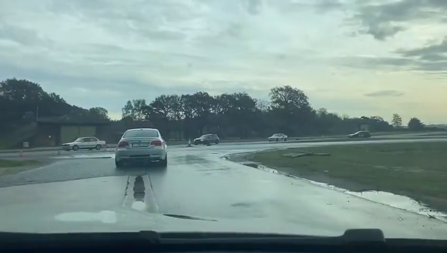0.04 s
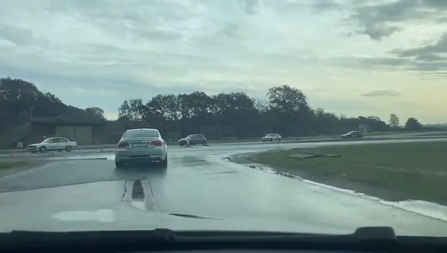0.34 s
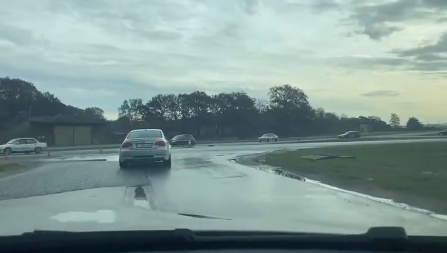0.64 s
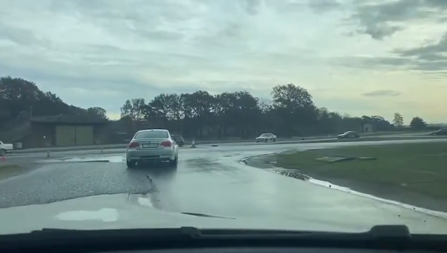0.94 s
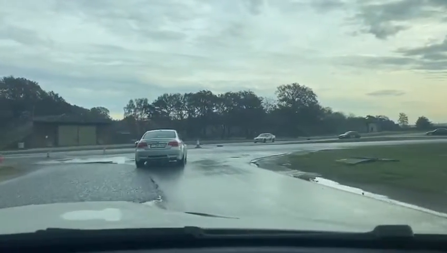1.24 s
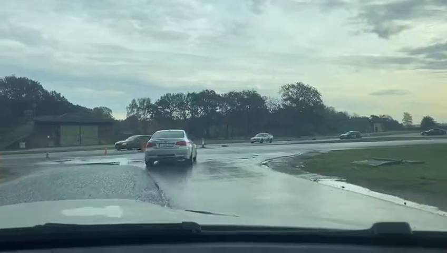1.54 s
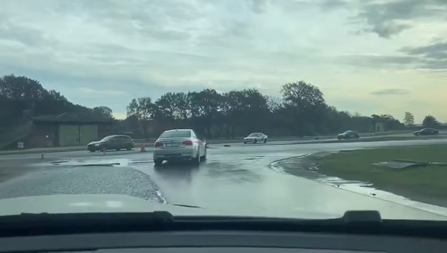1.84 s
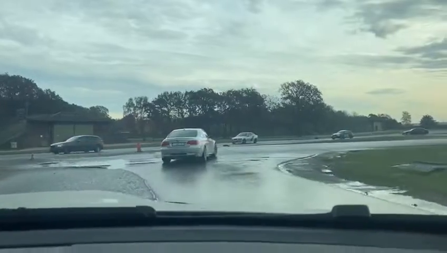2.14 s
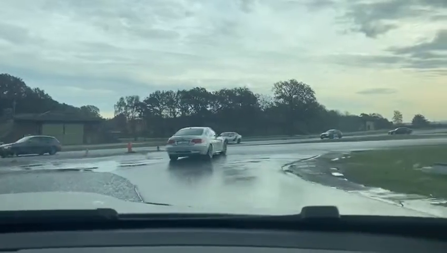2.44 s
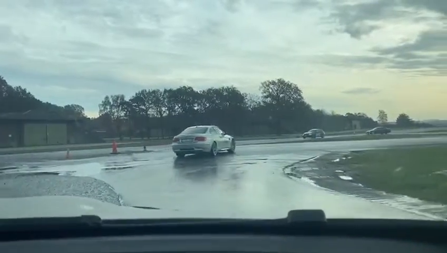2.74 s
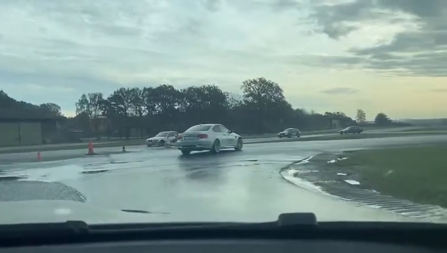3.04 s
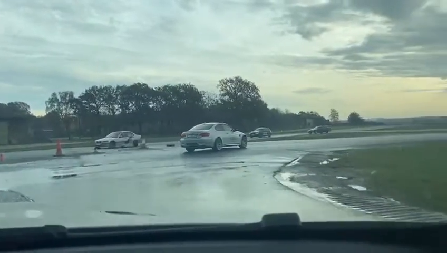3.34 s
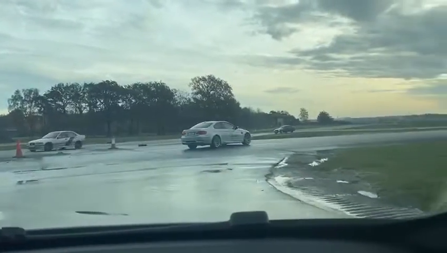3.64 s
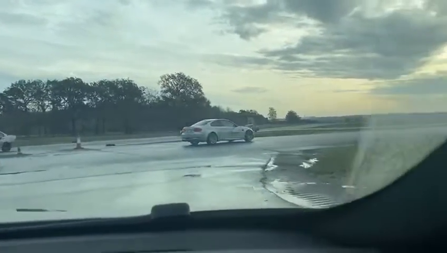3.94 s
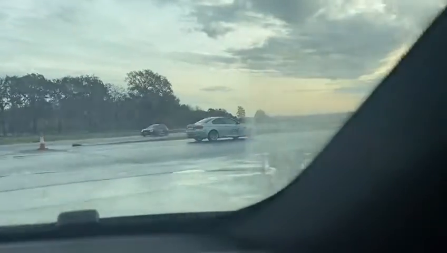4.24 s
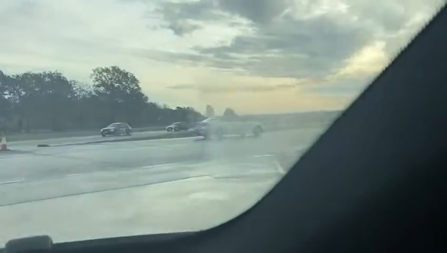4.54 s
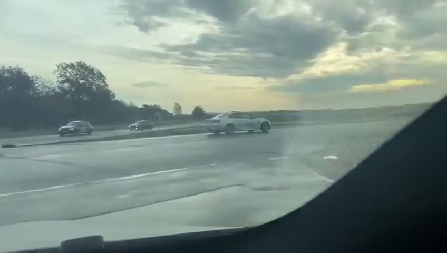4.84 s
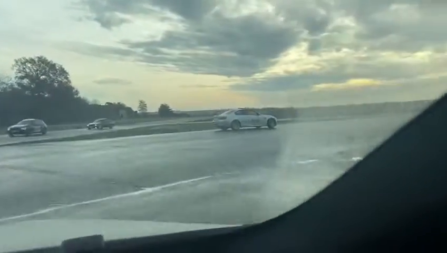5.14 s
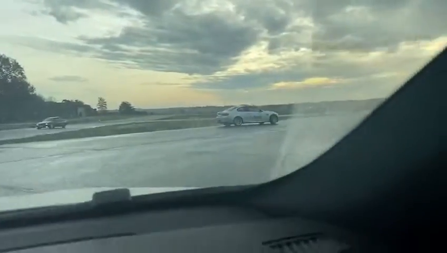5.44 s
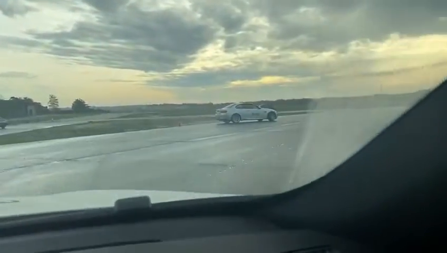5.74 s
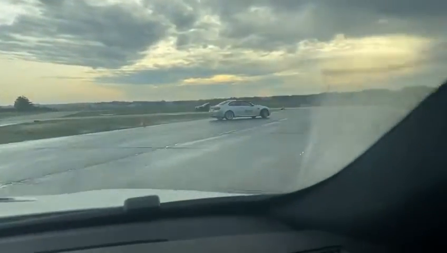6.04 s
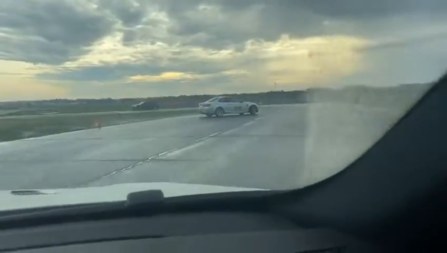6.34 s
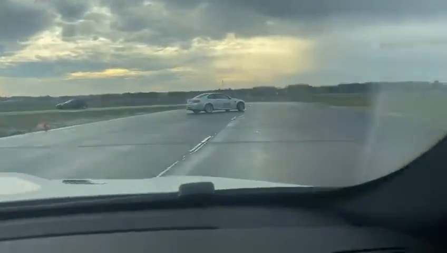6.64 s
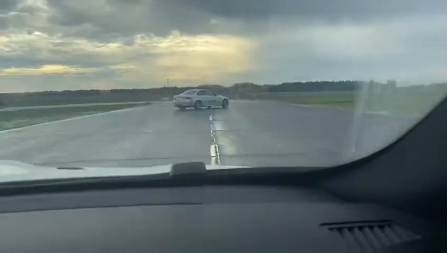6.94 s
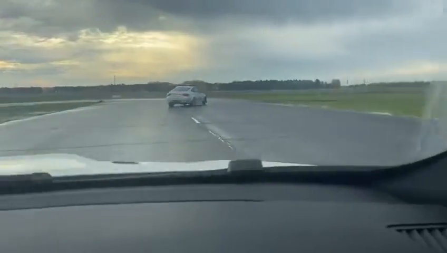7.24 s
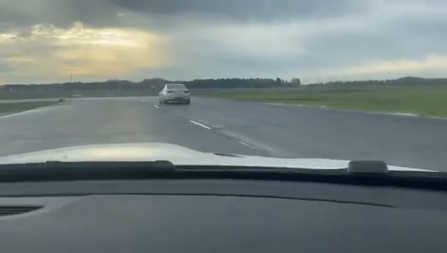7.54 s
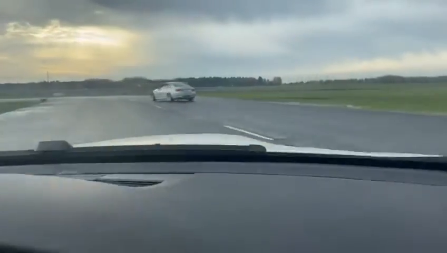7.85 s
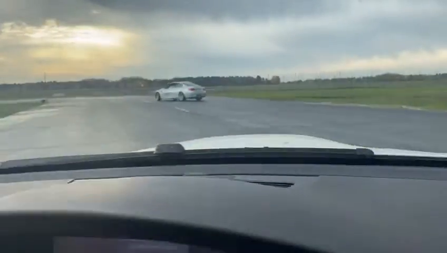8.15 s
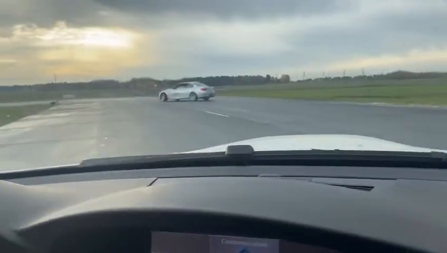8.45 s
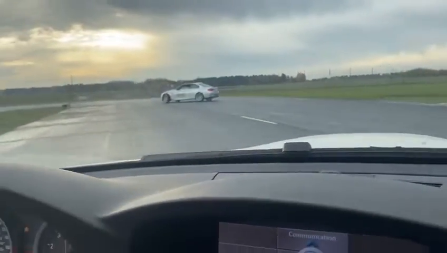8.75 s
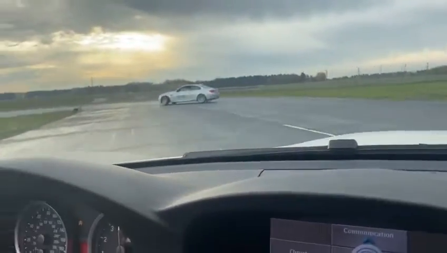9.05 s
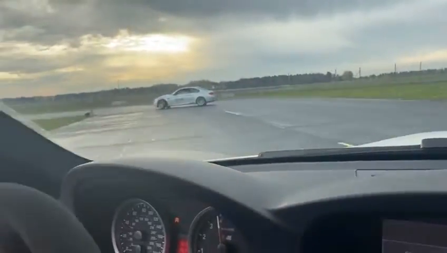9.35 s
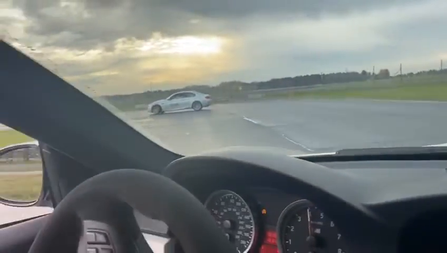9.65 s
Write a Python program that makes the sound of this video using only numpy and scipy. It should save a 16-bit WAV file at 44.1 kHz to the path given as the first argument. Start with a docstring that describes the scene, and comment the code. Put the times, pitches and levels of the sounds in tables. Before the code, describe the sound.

A low engine drone booms inside a car drifting on a wet track, revving up three times over tyre roar and water spray.

```python
"""A low engine drone over road rumble, from a stereo microphone inside a six-cylinder car drifting round a
wet track. Its firing pulses boom in the body and climb in three pulls of throttle. The exhaust of the car
it chases sings through the glass, and a third car hums further off. Close by, the tyres roar and scrub,
water washes and sprays in the wheel arches, loose trim knocks and the final drive whines faintly."""
import sys
import numpy as np
from scipy import signal
from scipy.fft import rfft, irfft, next_fast_len
from scipy.io import wavfile
from scipy.ndimage import uniform_filter1d

SR = 44100
rng = np.random.default_rng(int(sys.argv[2]) if len(sys.argv) > 2 else 0)


def master(y):
    """Save y as 16-bit WAV."""
    cut = np.clip(np.atleast_2d(y).T, -1, 1)
    pcm = np.round(cut * 32767)  # scale
    wavfile.write(sys.argv[1], SR, pcm.astype(np.int16))


N = 427769
T = np.arange(N) / SR
SIZE = next_fast_len(N + SR // 4)
BINS = np.arange(SIZE // 2 + 1) * SR / SIZE

# strength of each of the six cylinders on throttle: gain_db
LOADED_CYLINDERS = [-4.5, -8.5, 0, -9.5, 6.5, -1.5]
# the car's own exhaust, heard from the cabin: frequency_hz, gain_db
RASP_COLOUR = [(90, -52), (170, -9), (260, 13.5), (380, -4), (520, 0), (750, -16.5), (1050, -17),
               (1600, -21), (3500, -48.5)]
# spray in the wheel arches, heard from the cabin: frequency_hz, gain_db
SPRAY_COLOUR = [(600, -16), (1500, 2.5), (2400, 6), (3500, 2), (5500, 2.5), (7200, 0.5), (8400, -21.5),
                (9400, 2), (10900, -2), (12000, -34.5)]


def engine():
    """The six-cylinder around the microphone: a low drone, and three pulls that climb in pitch."""
    # two stabs of throttle, each: time_s, firing_hz, firing_db, rasp_db
    first_stab = [(2.7, 119.7, -21.5, -45.5), (2.9, 142.2, -19.5, -41.5), (3.05, 167.7, -14, -38.5),
                  (3.18, 195.6, -27, -40.5), (3.3, 235.7, -29, -31), (3.4, 262, -28, -30.5),
                  (3.52, 291.3, -39, -37.5), (3.62, 285, -58, -44)]
    last_stab = [(6.72, 196.3, -23, -38), (6.82, 197.6, -18, -29), (6.9, 218.5, -19, -30),
                 (7.04, 258.3, -13, -25.5), (7.1, 285.4, -27.5, -36), (7.2, 302, -34, -32),
                 (7.28, 298, -40, -49)]
    return (rolling_drone() + sliding_boom()
            + throttle_stab(first_stab, rasp_gain_db=2, scatter_db=2.5, snarl_db=-6.5, octave_db=-5)
            + long_pull()
            + throttle_stab(last_stab, rasp_gain_db=-.5, scatter_db=9, snarl_db=-11.5, octave_db=-3.5))


def rolling_drone():
    """Part throttle: three firings a crank turn make a low tone, with weaker half orders beside it."""
    # the engine rolling up: time_s, crank_hz, firing_db
    roll = [(0.0, 44.57, -5), (0.19, 45, -40), (0.6, 52.53, -33.5), (1.2, 44.1, -25.5), (1.45, 44, -38.5),
            (1.53, 45.97, -19.5), (1.72, 44.04, -18), (2.4, 49, -24), (2.85, 48.32, -29)]
    crank_hz, firing_db = curves(roll)
    firings = 3 * turns(crank_hz, .0054)
    drone = tone(firings, firing_db, .97)
    drone += tone(firings / 2, firing_db - 8, .7) + tone(1.5 * firings, firing_db - 19.5, 3)
    return drone * sounding(roll)


def sliding_boom():
    """Holding the slide: under load the crank orders boom in the body, over firing tone and rasp."""
    # the engine in the slide: time_s, crank_hz, firing_db, rasp_db
    slide = [(6.45, 51.9, -50, -41.5), (6.7, 49.18, -20, -29.5), (7.0, 50.27, -41, -33),
             (7.6, 48.25, -43, -42.5), (8.3, 47.71, -34, -24), (8.75, 46.27, -30, -33),
             (9.0, 44.34, -25, -34.5), (9.3, 44.22, -20.5, -31), (9.7, 46, -17.5, -33)]
    # spells under load: start_s, end_s, first_order_db, second_order_db
    booms = [(6.522, 6.887, -10.5, -17), (6.933, 6.994, -14.5, -30.5), (7.189, 7.225, -17.5, -9.5),
             (7.573, 7.742, -24.5, -14.5), (7.78, 9.206, -15.5, -20.5)]
    # overtones against the boom's first order: crank_order, gain_db
    overtones = [(4, -20), (5, -13.5), (7, -21.5), (8, -23.5)]
    # strength of each cylinder in the slide: gain_db
    cylinders = [0, -3.5, -5.5, -6, -15, -2]
    crank_hz, firing_db, rasp_db = curves(slide)
    crank = turns(crank_hz, .005016)
    first = swells(booms, column=2, attack_s=.023, release_s=.038, floor_db=-28)
    second = swells(booms, column=3, attack_s=.023, release_s=.038, floor_db=-29)
    boom = first * tone(crank, 0, .7) + second * tone(2 * crank, 0, 4.2)
    boom += first * sum(tone(order * crank, db, 3.4) for order, db in overtones)
    firing = tone(3 * crank, firing_db, .96) + tone(9 * crank, firing_db - 19.5, 4.3)
    rasp = undb(rasp_db) * exhaust(3 * crank, cylinders, scatter_db=6, gas=.072)
    return (boom + firing + rasp) * sounding(slide)


def throttle_stab(table, rasp_gain_db, scatter_db, snarl_db, octave_db):
    """The wheels spin up: the firing tone climbs, the exhaust rasps and the intake snarls in gulps."""
    firing_hz, firing_db, rasp_db = curves(table)
    # the intake, heard from the cabin: frequency_hz, gain_db
    snarl_colour = [(300, -12), (520, 2.5), (740, -2.5), (860, -11.5), (1000, -9), (1400, -22.5)]
    firings = turns(firing_hz, .012)
    rasp = undb(rasp_db + rasp_gain_db) * exhaust(firings, LOADED_CYLINDERS, scatter_db, gas=.92)
    octave = tone(2 * (firings + .035 * walk(120)), rasp_db + octave_db, 2.5)
    throat = tone(1.5 * firings, rasp_db - 8, 2.5)  # the two halves of the manifold differ
    gulps = undb(5 * np.cos(2 * np.pi * firings) + 3 * walk(45))
    snarl = undb(rasp_db + snarl_db) * noise(snarl_colour, (300, 1500), gulps)
    snarl += tone(4 * (firings + .05 * walk(120)), rasp_db + snarl_db - 13, 3)
    return (tone(firings, firing_db, 1.1) + octave + throat + rasp + snarl) * sounding(table)


def long_pull():
    """Under load from low revs: a clean, rising firing tone and throaty side orders over a light rasp."""
    # the engine through the bend: time_s, firing_hz, firing_db, rasp_db
    bend = [(3.78, 78, -19, -70), (4.25, 87.7, -18.5, -34), (4.45, 102.4, -14, -38.5),
            (5.08, 126.4, -12, -35), (5.42, 151.1, -7.5, -22.5), (5.8, 190.9, -11, -46.5),
            (5.97, 216.6, -12.5, -28), (6.08, 230.3, -16.5, -33.5), (6.35, 218.9, -15.5, -45),
            (6.6, 220.4, -23, -44)]
    firing_hz, firing_db, rasp_db = curves(bend)
    firings = turns(firing_hz, .004)
    cutoff_hz, slope_hz = 260.3, 20.8  # the cabin muffles the octave once it climbs past the cut-off
    muffled = (1 + np.tanh((2 * firing_hz - cutoff_hz) / slope_hz)) / 2
    octave_db = firing_db - 9.5 * (1 - muffled) - 27 * muffled
    rasp = undb(rasp_db - 2.5) * exhaust(firings, LOADED_CYLINDERS, scatter_db=2.5, gas=.15)
    firing = tone(firings, firing_db, .9) + tone(2 * firings, octave_db, 1.5)
    throat = tone(1.5 * firings, rasp_db - 5.5, 2.8) + tone(2.5 * firings, rasp_db - 8.5, 1.8)
    throat += tone(3 * firings, rasp_db - 14, 2.7)
    return (firing + throat + rasp) * sounding(bend)


def exhaust(firings, cylinders, scatter_db, gas):
    """A pulse per firing, uneven over the cylinders, each with a puff of gas; steady rms 1."""
    count = np.arange(1, int(firings[-1]))
    at = np.interp(count, firings, np.arange(N))
    cylinder_db = np.array(cylinders)[count % len(cylinders)]
    size = undb(cylinder_db + scatter_db * rng.standard_normal(len(count)))
    sample, late = at.astype(int), at % 1  # each pulse is shared between two samples
    pulses = np.bincount(sample, size * (1 - late), N + 1) + np.bincount(sample + 1, size * late, N + 1)
    puffs = np.exp(-2 * (firings % 1)) * rng.standard_normal(N)
    rasp = shape(unit(pulses[:N]) + gas * unit(puffs), response(RASP_COLOUR))
    return rasp / np.sqrt(uniform_filter1d(rasp ** 2, SR // 10) + 1e-12)


def car_ahead():
    """Mostly its firing octave gets through the glass; on throttle its orders bark in cabin resonances."""
    # the engine of the car being chased: time_s, firing_hz, octave_db
    revs = [(0.0, 183.3, -45.5), (1.5, 184.4, -40.5), (1.75, 168.5, -41.5), (1.92, 184.4, -28.5),
            (2.15, 215, -41), (2.6, 192.2, -34.5), (2.85, 188, -28), (3.1, 192.6, -35), (3.4, 184.4, -26.5),
            (3.7, 204.3, -34.5), (3.98, 188.2, -26.5), (4.25, 181.1, -25.5), (4.7, 173.6, -35),
            (5.1, 178, -31), (5.3, 196.8, -26.5), (5.5, 177.1, -26), (5.6, 181.3, -17.5),
            (5.79, 194.3, -22), (6.02, 204.1, -32), (6.28, 217, -28), (6.55, 221, -47)]
    # its bursts of throttle: start_s, end_s, bark_db, growl_db
    barks = [(1.955, 2.034, -38, -56.5), (3.4, 3.68, -45.5, -55.5), (3.926, 4.102, -42.5, -56),
             (5.252, 5.34, -31, -41), (5.547, 5.727, -23, -44), (5.75, 6.065, -25, -34),
             (6.096, 6.269, -40, -42)]
    # its exhaust orders, 2.5 to 8.5 times the firing rate in half steps: gain_db
    orders = [-2.5, 2, -19.5, 1, 0, 2.5, -0.5, -0.5, -10.5, 2, -3.5, 8.5, 2]
    # the resonances those orders sweep through: frequency_hz, gain_db
    bark_colour = [(300, -15.5), (450, -15), (540, -3.5), (610, 3.5), (680, -4), (750, 1.5), (810, -1),
                   (900, -9), (1000, -9), (1150, -17.5), (1360, -16), (1600, -42.5), (3000, -42)]
    # its gas noise: frequency_hz, gain_db
    growl_colour = [(300, -6), (480, 3), (720, -6), (960, 4.5), (1120, -7), (1500, -20)]
    firing_hz, octave_db = curves(revs)
    firings = turns(firing_hz, .0035)
    throttle = swells(barks, column=2, attack_s=.1, release_s=.14, floor_db=-62, edge_db=-1)
    growl = swells(barks, column=3, attack_s=.1, release_s=.14)
    flat_out = throttle / throttle.max()  # the uneven banks' half orders come in with the throttle
    shake = .012 + .009 * growl / growl.max()
    pipes = sum(tone(k / 2 * (firings + shake * walk(110)), db, 2.5) * flat_out ** (k % 2)
                for k, db in enumerate(orders, 5))
    throb = undb(5 * np.cos(np.pi * firings) + 2 * walk(60))  # at half the firing rate
    gas = noise(growl_colour, (300, 1500), throb)
    song = tone(2 * firings, octave_db, 2.6) + tone(firings, octave_db - 4, 1.2)
    return song + throttle * shape(pipes, response(bark_colour)) + growl * gas


def wet_road():
    """The body rumbles, the tread roars, and water washes the floor and spatters the arches in clumps."""
    # relative road noise, louder with speed and wheelspin: time_s, rumble_db, roar_db, wash_db
    road = [(0.0, -21, -46, -56.5), (1.3, -25.5, -43, -66), (2.1, -25, -43, -56.5), (2.9, -21, -44, -55),
            (3.5, -19.5, -42, -46.5), (3.9, -20, -38.5, -53.5), (4.5, -18, -32, -47.5),
            (5.05, -20, -34, -43.5), (5.6, -19, -32.5, -42), (6.2, -17.5, -28.5, -39),
            (6.45, -19.5, -46, -42), (7.0, -19.5, -23.5, -49), (7.45, -18, -46, -41),
            (7.64, -16.5, -34.5, -40.5), (7.9, -19, -27, -34), (8.37, -19.5, -26.5, -34),
            (9.05, -20.5, -38, -38.5), (9.7, -22.5, -33, -38.5)]
    # puddles hitting the car, in relative levels: start_s, end_s, spray_db, wash_db
    puddles = [(1.58, 1.767, -62, -58.5), (2.547, 2.877, -62.5, -66), (3.95, 4.353, -56, -56.5),
               (4.514, 4.96, -51.5, -57), (5.28, 6.34, -50.5, -53), (6.591, 6.818, -47, -34.5),
               (7.494, 7.695, -56.5, -58), (7.798, 7.975, -47.5, -35), (7.995, 8.484, -53, -55)]
    # body rumble, tyre roar and water wash in the cabin, each: frequency_hz, gain_db
    rumble_colour = [(15, -24.5), (28, -12), (40, 2.5), (65, 0.5), (100, 1.5), (140, -3.5), (200, -9),
                     (300, -31.5)]
    roar_colour = [(80, -20.5), (150, 3.5), (230, 9.5), (310, -0.5), (520, -10.5), (800, -20.5),
                   (1300, -32), (2500, -40)]
    wash_colour = [(250, -7.5), (500, 11.5), (1100, 11), (1500, 3), (2000, 2), (3000, -8.5), (5000, -19),
                   (11000, -58)]
    rumble_db, roar_db, wash_db = curves(road)
    # a puddle is shallower at its edges
    splash = swells(puddles, column=2, attack_s=.035, release_s=.018, edge_db=-6)
    surge = swells(puddles, column=3, attack_s=.035, release_s=.018, edge_db=-6)
    depth = (splash / splash.max()) ** 2
    clumps = undb(1.9 * depth * walk(190))
    mist = np.hypot(undb(-63), undb(wash_db - 21.5))  # the spray left between puddles
    drops = undb(2.4 * walk(2500) + .6 * walk(45))
    rumble = noise(rumble_colour, (55, 85))
    roar = noise(roar_colour, (280, 340))
    wash = noise(wash_colour, (1400, 2600)) * np.hypot(undb(wash_db), surge)
    spray = noise(SPRAY_COLOUR, (4500, 7500), drops) * np.hypot(mist, splash)
    tyres = rumble * undb(rumble_db - 3.5) + roar * undb(roar_db - 4 + 1.3 * walk(14))
    water = wash * undb(-6 + 1.37 * walk(20)) + spray + spatter() * splash * depth * undb(-9)
    return tyres + clumps * water


def spatter(drops_per_s=380, spread_db=3):
    """Single drops tick against the arches: many small ones and a few big ones."""
    hits = rng.random(N) < drops_per_s / SR
    sizes = undb(spread_db * np.minimum(rng.exponential(size=N), 4))
    return noise(SPRAY_COLOUR, (4500, 7500), hits * sizes)


def third_car():
    """A car further round the track: only the firing tone and a little of its octave carry this far."""
    # the distant engine: time_s, firing_hz, level_db
    revs = [(1.6, 198, -36.5), (2.15, 212, -33), (2.4, 224, -36.5), (2.65, 243, -29.5), (2.85, 258, -37),
            (3.0, 250, -52), (3.25, 172, -35.5), (3.4, 172.1, -23), (3.6, 182, -27), (4.05, 198, -24),
            (4.3, 207, -24.5), (4.5, 220, -24.5)]
    firing_hz, level_db = curves(revs)
    firings = turns(firing_hz, .005)
    hum = tone(firings, level_db, 1.8) + tone(2 * firings, level_db - 18, 3.4)
    return hum * sounding(revs, fade_s=.091)


def trim_knocks():
    """A loose part or a slap of water ticks against a padded panel and sets it ringing."""
    # the knocks, in relative levels: start_s, thud_db, tick_db, tick_hz, tick_decay_s
    knocks = [(0.413, -25, -46.5, 910, 0.0035), (0.69, -26.5, -60, 800, 0.0056),
              (0.883, -51, -47, 2190, .008), (1.385, -35.5, -43, 1500, 0.00074),
              (4.088, -24.5, -44, 1500, .006), (4.271, -22, -55.5, 2003, 0.0022),
              (5.569, -25, -44.5, 3033, .003), (6.577, -26, -33, 2000, .004), (7.155, -22, -32, 563, .012)]
    # trim panel modes, detuned afresh at every knock: nominal_hz, gain_db, t60_s
    panel = [(261, 12, 0.096), (365, 8, 0.073), (473, -6.5, 0.051), (744, -2, 0.077), (1600, -14, 0.052)]
    out, t = np.zeros(N + SR), T[:SR // 5]
    onset = 1 - np.exp(-t / .001)
    for start_s, thud_db, tick_db, tick_hz, decay_s in knocks:
        ring = onset * sum(undb(db - 60 * t / t60) * np.sin(2 * np.pi * hz * rng.uniform(.79, 1.05) * t)
                           for hz, db, t60 in panel)
        width_hz = min(5 / decay_s, SR / 4)  # the shorter a tick, the wider its band
        band = signal.iirpeak(tick_hz, tick_hz / width_hz, fs=SR)
        burst = np.exp(-t / decay_s) * rng.standard_normal(len(t))
        tick = unit(signal.lfilter(*band, signal.lfilter(*band, burst)))
        out[int(start_s * SR):][:len(t)] += undb(thud_db - 6.5) * ring + undb(tick_db - 15.5) * tick
    return out[:N]


def tyre_scrub(drift=.016, jitter=.05):
    """Tread blocks stick and slip on the wet surface: broken, wavering chirps, short of a squeal."""
    # tyres sliding sideways: start_s, end_s, pitch_hz, level_db
    skids = [(2.48, 3.0, 1260, -50), (6.01, 6.059, 1150, -40.5), (6.24, 6.378, 1300, -42),
             (7.597, 8.299, 1090, -43.5), (8.297, 9.703, 1120, -41)]
    # tread resonances: pitch_ratio, gain_db
    tread = [(1, -1), (.735, -5), (1.17, -2), (1.5, -5.5)]
    pitch_hz, = curves([(s, hz) for start, end, hz, _ in skids for s in (start, end)])
    pitch_hz *= 1 + drift * walk(8)
    level = swells(skids, column=3, attack_s=.08, release_s=.095)
    modes = [tone(turns(ratio * pitch_hz * (1 + jitter * walk(300)), drift), db, 2.8)
             for ratio, db in tread]
    # a light slide chatters as the tread catches; a hard one runs on and the other resonances join in
    hard = level / level.max()
    catches = undb(4 * (1 - hard) * (np.tanh(walk(150)) - .5))
    return level * catches * (modes[0] + hard * sum(modes[1:]))


def final_drive():
    """Gear teeth whine faintly while the rear wheels spin."""
    # the meshing gears: time_s, mesh_hz, relative_db
    whine = [(8.3, 530.4, -40.5), (9.136, 517.7, -35), (9.55, 554.4, -41.5), (9.7, 552, -38)]
    mesh_hz, relative_db = curves(whine)
    return tone(turns(mesh_hz, .0033), relative_db - .5, .78) * sounding(whine, fade_s=.16)


def trim_squeak(start_s=4.376, length_s=.04, pitch_hz=4300):
    """Two pieces of trim rub in two short jerks as the body twists."""
    jerks = np.sin(2 * np.pi * np.clip((T - start_s) / length_s, 0, 1))
    rough_hz = pitch_hz * (1 + .08 * walk(1500))
    return tone(turns(rough_hz, .01), -52, 3) * jerks


def cabin(mid, around, width_colour, width_db, direct):
    """Direct sound reaches the left capsule first; sound from all around scatters off the glass."""
    t, lag_s = T[:SR // 16], .00042
    scatter = rfft(rng.standard_normal(len(t)) * np.exp(-t / .011), SIZE)
    lead = 1j * direct * np.tanh(4 * np.sin(2 * np.pi * np.minimum(BINS * lag_s, 1)))
    diffuse = np.sqrt(1 - abs(lead) ** 2) * scatter / abs(scatter)
    width = response(width_colour) * undb(width_db)
    side = shape(mid, width * lead) + shape(around, width * diffuse)
    return np.array([mid + side, mid - side])


def through_glass(car, swing_s=(2.5, 4.1)):
    """The cabin's standing waves change as the chased car swings from dead ahead to the side."""
    # side against mid at the microphone, with that car in front and then aside: frequency_hz, gain_db
    front_width = [(150, -11), (380, -3), (580, 7.5), (780, 1), (970, 9.5), (2000, 1.5)]
    aside_width = [(150, -10), (280, -1), (360, 10), (395, 2), (520, 8), (600, 2.5), (660, 3.5),
                   (730, 23.5), (800, 10), (880, 4.5), (980, -2), (1400, 4.5)]

    def place(width, direct):
        mid = shape(car, 1 / np.hypot(1, response(width)))  # so that width adds no power
        return cabin(mid, mid, width, width_db=0, direct=direct)

    swing = np.interp(T, swing_s, [0, 1])
    return (1 - swing) * place(front_width, direct=.99) + swing * place(aside_width, direct=1)


def undb(db):
    """Decibels to gain."""
    return 10 ** (np.asarray(db) / 20)


def unit(x):
    """Scale to rms 1."""
    return x / np.sqrt(np.mean(x ** 2))


def curves(table):
    """The columns after a table's time column, sample by sample."""
    time_s, *columns = np.transpose(table)
    return [np.interp(T, time_s, column) for column in columns]


def sounding(table, fade_s=.018):
    """1 between the times of the first and last row, fading outside."""
    return np.clip(1 + np.minimum(T - table[0][0], table[-1][0] - T) / fade_s, 0, 1)


def swells(events, column, attack_s, release_s, floor_db=-np.inf, edge_db=0):
    """Gain of events that rise, arch up to the dB in one column and die away to a steady floor."""
    power = undb(floor_db) ** 2
    for event in events:
        start, end, db = event[0], event[1], event[column]
        outside = np.maximum(start - T, 0) / attack_s + np.maximum(T - end, 0) / release_s
        arch = np.minimum(((2 * T - start - end) / (end - start)) ** 2, 1)
        power = power + (undb(db + edge_db * arch) * np.exp(-outside)) ** 2
    return np.sqrt(power)


def response(colour):
    """Gain of a (frequency_hz, gain_db) colour on the frequency grid, falling off beyond its ends."""
    hz, db = np.transpose(colour)
    ends = np.minimum(BINS / hz[0], 1) * np.minimum(hz[-1] / (BINS + 1), 1)
    return undb(np.interp(np.log(BINS + 1), np.log(hz), db)) * ends ** 2


def shape(x, gain):
    """Filter by a gain on the frequency grid."""
    return irfft(rfft(x, SIZE) * gain, SIZE)[:N]


def walk(rate_hz):
    """A smooth random wander with a spread near 1."""
    step = max(int(SR / rate_hz), 1)
    return 1.2 * uniform_filter1d(np.repeat(rng.standard_normal(N // step + 1), step), step)[:N]


def noise(colour, band_hz, drive=1):
    """Noise modulated by drive, then coloured, with rms 1 inside a band."""
    gain = response(colour)
    inside = np.sum(gain[(BINS > band_hz[0]) & (BINS < band_hz[1])] ** 2) / len(BINS)
    return shape(unit(drive * rng.standard_normal(N)), gain) / np.sqrt(inside)


def turns(hz, wander):
    """Cycles run so far, at a slightly unsteady speed."""
    return np.cumsum(hz * (1 + wander * walk(40))) / SR


def tone(cycles, db, flutter_db):
    """A sine that flutters about an rms level."""
    return np.sqrt(2) * np.sin(2 * np.pi * cycles) * undb(db + flutter_db * walk(25))


def scene():
    """The cars, the road and the trim, as they reach the microphone in the cabin."""
    # side against mid at the microphone: frequency_hz, gain_db
    width = [(25, -29), (60, -22.5), (120, -25), (200, -6.5), (320, -9), (420, 0), (900, 3), (1450, 4.5),
             (1750, -2), (2400, -5), (3300, -2), (11000, -2)]
    engines = engine() + third_car()
    ahead = car_ahead()
    chassis = final_drive() + trim_knocks() + trim_squeak() + tyre_scrub()
    # the wheels make unrelated noise, so two separate draws of the road surround the listener
    road = cabin(wet_road() + chassis, wet_road() + chassis, width, width_db=-.3, direct=.99)
    engines = cabin(engines, engines, width, width_db=.3, direct=.97)
    return (engines * undb([[-.7], [.7]])  # left and right trims
            + through_glass(ahead) * undb([[1], [-1]])
            + road * undb([[.5], [-.5]]))


def record(dry, top_hz=11300):
    """The recorder rounds the loudest peaks and cuts the top."""
    rounded = dry / (1 + abs(dry) ** 8) ** (1 / 8)
    return signal.sosfilt(signal.ellip(8, .2, 70, top_hz, fs=SR, output="sos"), rounded)


dry = scene()
out = record(dry)
master(out)
```